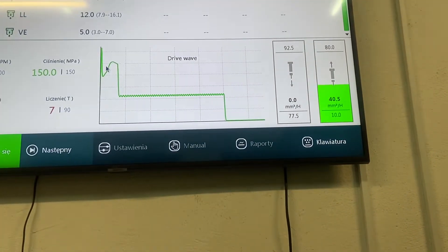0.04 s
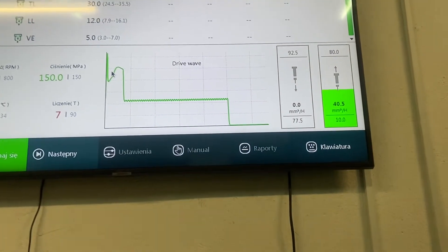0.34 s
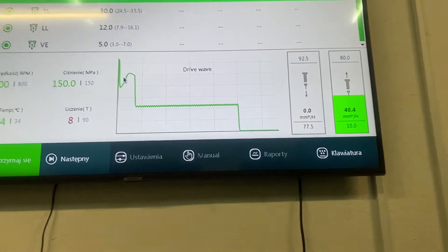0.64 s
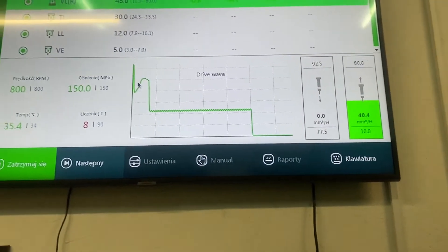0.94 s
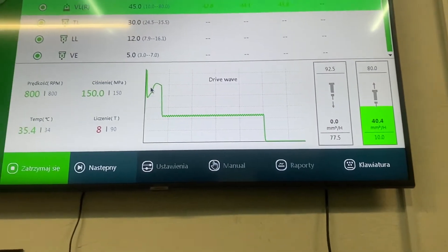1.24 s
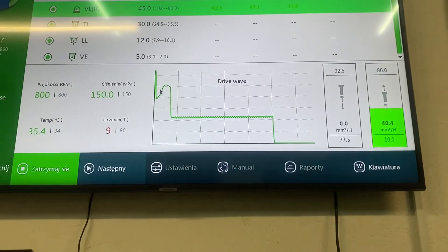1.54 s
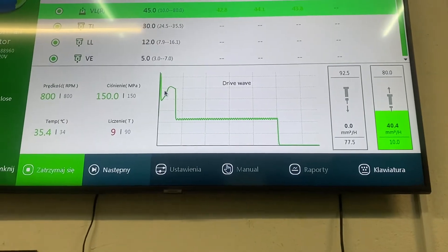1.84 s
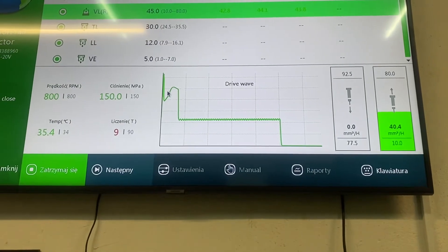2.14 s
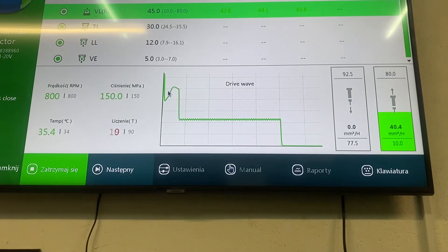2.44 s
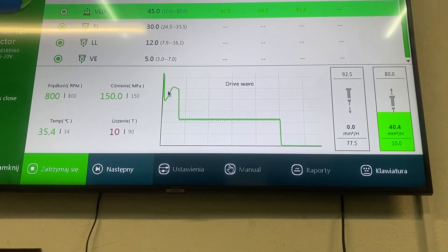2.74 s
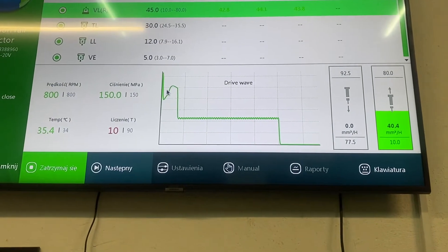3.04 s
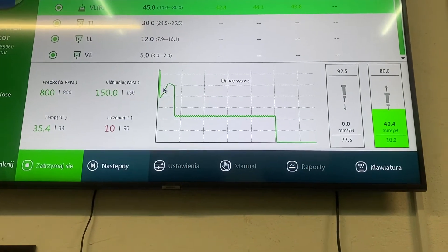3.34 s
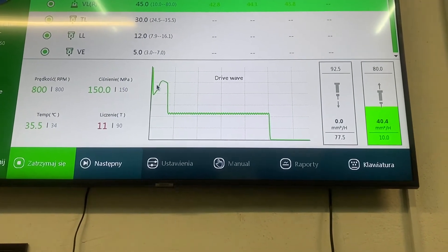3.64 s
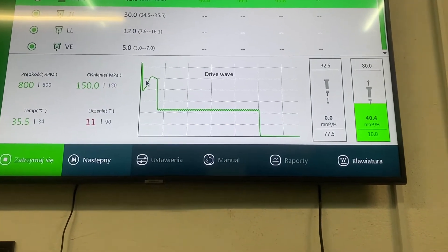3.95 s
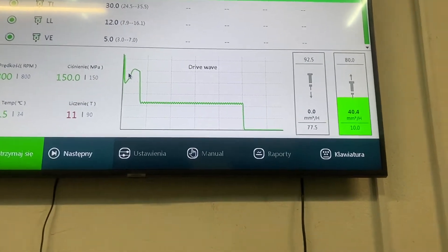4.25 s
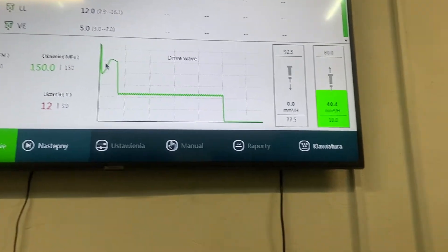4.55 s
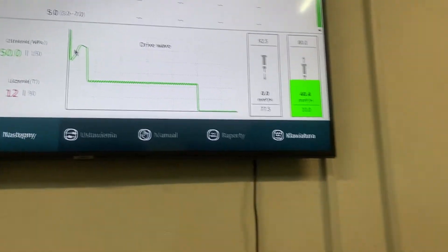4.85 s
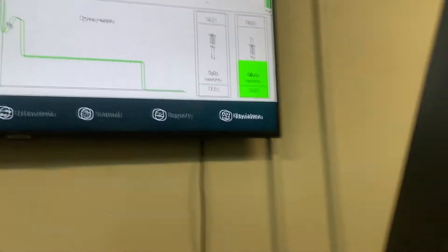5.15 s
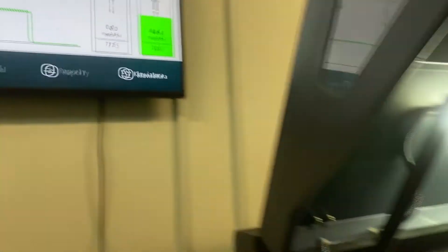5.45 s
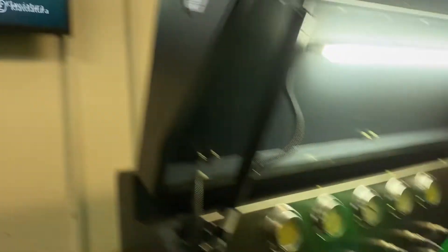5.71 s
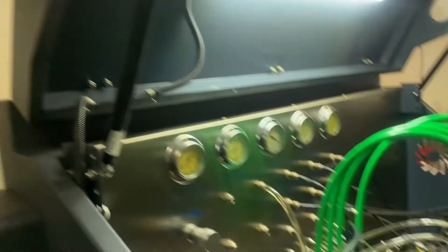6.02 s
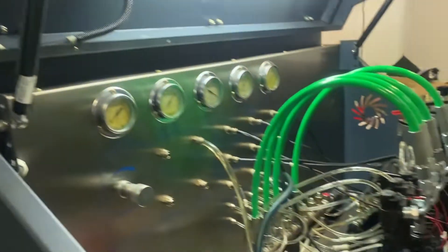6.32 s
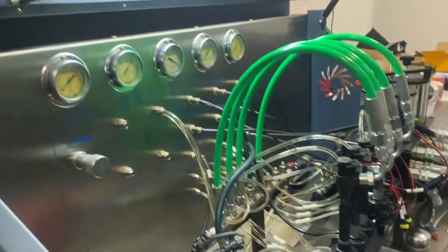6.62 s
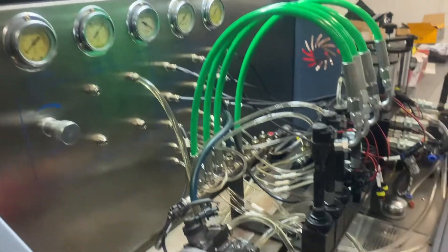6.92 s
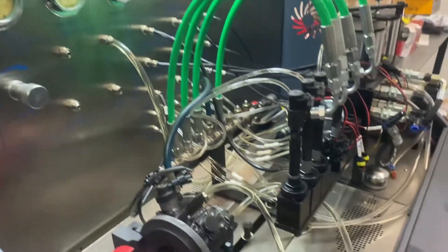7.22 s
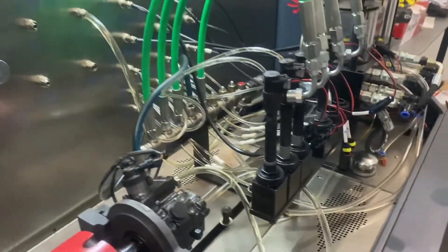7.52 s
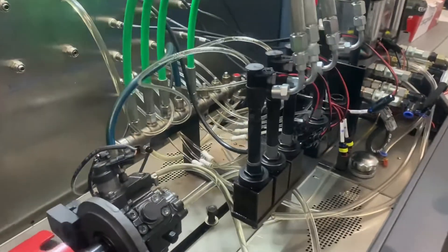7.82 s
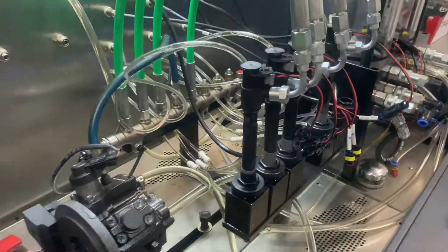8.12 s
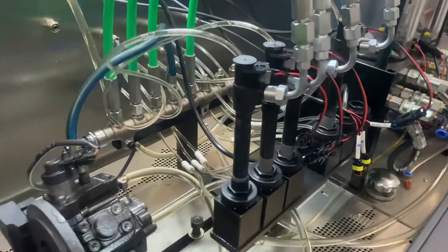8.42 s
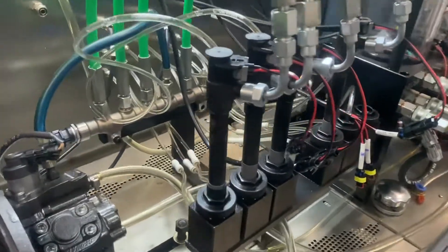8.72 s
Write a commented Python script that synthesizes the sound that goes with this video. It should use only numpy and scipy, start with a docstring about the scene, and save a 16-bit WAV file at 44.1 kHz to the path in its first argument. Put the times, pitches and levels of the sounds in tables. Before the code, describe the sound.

A diesel injector test bench runs without a break in a workshop. Its pump gives a steady low drone and fast metallic clacking, while an injector ticks evenly about seventeen times a second. Oil and fans hiss and hum beneath, and a thin, high motor whine fades in and out. For the first 4.5 seconds or so the machine is a little distant, mixed with room reflections. Between about 4.7 and 5.7 seconds the microphone moves up to the bench: everything grows louder and brighter, with sharper ticks, small fizzing spits of spray and steel parts ringing at shifting pitches. A soft, low handling bump comes at about 7.3 seconds. From around 8 seconds the microphone is closest and the ticking is strongest. The bass drops away at about 8.4 seconds, and the machine is still running at the end, near 9 seconds.

```python
"""In a workshop a diesel injector test bench runs while the microphone moves from the wall screen to the
open bench. A three-plunger pump forces its frame into a drone and clacks once per plunger and turn.
The injector ticks at its own rate, and each impact sets the steel ringing in its natural modes.
Oil and fans hiss beneath, and the motor's inverter whines thinly among the room's standing waves."""
import sys
import numpy as np
from scipy import signal
from scipy.fft import rfft, irfft, next_fast_len
from scipy.io import wavfile
from scipy.ndimage import uniform_filter1d

SR = 44100
rng = np.random.default_rng(int(sys.argv[2]) if len(sys.argv) > 2 else 0)


def write(x):
    x = np.atleast_2d(x).T
    wavfile.write(sys.argv[1], SR, np.round(np.clip(x, -1, 1) * 32767).astype(np.int16))


N = 386757
TIME = np.arange(N) / SR
TAIL = np.arange(8192) / SR  # time axis of one impulse response
TAIL_HZ = np.fft.rfftfreq(len(TAIL), 1 / SR)
SHAFT_HZ, FIRING_HZ, FIRST_FIRING_S = 11.84, 17.0, .0198

# the microphone lingers at the screen, swings round, leans in (time [s], nearness to the bench [0-1])
NEARNESS = [(0, 0.19), (1.7, 0), (4.7, 0.04), (5.7, 0.7), (6.4, 0.75), (7.3, 0.73), (7.9, 0.91),
            (8.35, 0.95), (8.77, 0.97)]
# three stations: afar, beside the bench, leaning in (nearness [0-1])
STATIONS = [0, .76, .98]
# likeness of left and right (frequency [Hz], correlation [-1 to 1])
COHERENCE = [(60, 1), (130, 0.93), (250, 0.83), (400, 0.73), (700, 0.27), (1300, 0.09), (2400, 0.22),
             (4500, 0.61), (8000, 0.15), (11000, 0.2), (15000, -0.36)]


def gain_of(db):
    """Amplitude ratio of a level in decibels."""
    return 10 ** (np.asarray(db) / 20)


def curve(rows, hz, column=1):
    """One column of a spectrum table, interpolated in log frequency."""
    table = np.transpose(rows)
    return np.interp(np.log(hz + 1), np.log(table[0] + 1), table[column])


def shares(x, points):
    """Linear interpolation weights from each point to the next."""
    return np.transpose([np.interp(x, points, row) for row in np.eye(len(points))])


def drift(per_s):
    """Random fluctuation of about unit size."""
    knots = np.arange(0, TIME[-1] + 1, 1 / per_s)
    return np.interp(TIME, knots, rng.standard_normal(len(knots))).astype(np.float32)


def swell(at_s, half_s):
    """Gaussian envelope, from 0 to 1 and back."""
    return np.exp(-((TIME - at_s) / half_s) ** 2)


def travel_s(near):
    """Propagation delay: sound takes longer to reach the wall screen."""
    return .002 * (1 - near)


def port_phase(hz):
    """Phase difference between the microphone's ports; its cosine is their correlation."""
    return np.arccos(np.clip(curve(COHERENCE, hz), -1, 1))


def paired(spectra, hz):
    """Spatial coherence: two close ports hear a room alike in the bass, less so in the treble."""
    # (frequency [Hz], left above right [dB])
    balance = [(60, 0), (130, 4), (290, -0.5), (640, -1.5), (1410, -1), (3100, 2), (6820, 1.5), (15000, -1)]
    angle = (port_phase(hz) / 2).astype(np.float32)
    mid, side = np.cos(angle) * spectra[..., 0, :], np.sin(angle) * spectra[..., 1, :]
    lean = gain_of(curve(balance, hz) / 2).astype(np.float32)
    return np.stack([(mid + side) * lean, (mid - side) / lean], axis=-2)


def resonances(modes):
    """Modal superposition: a sum of steep, double-pole resonances."""
    return sum(gain_of(db) / (1 + 2j * (TAIL_HZ - hz) / width) ** 2 for hz, width, db in modes)


def by_station(modes):
    """The balance of modes depends on the listening position: one response a station."""
    return np.array([resonances([(hz, width, db[station]) for hz, width, *db in modes])
                     for station in range(len(STATIONS))])


def causal(spectrum, ring=0):
    """Minimum phase: nothing sounds before the blow. Spectrum table and ring add in power."""
    gain = np.hypot(abs(ring), gain_of(curve(spectrum, TAIL_HZ)))
    log_gain = np.log(np.r_[gain, gain[-2:0:-1]] + 1e-6)
    return np.exp(np.conj(signal.hilbert(log_gain)))[:len(gain)]


def strokes(first_s, per_s, colour, paths, rise_s, burst_t60, room_db, room_t60, fresh, uneven_db):
    """Periodic impacts at unit rms: reflections follow the position; `fresh` scatter is new each blow."""
    # the microphone reaches a new pattern of reflections (time [s])
    places = [0, 2.2, 4.8, 5.7, 6.8, 8.2, 9.5]
    onsets = first_s + np.arange(-2, TIME[-1] * per_s, 1) / per_s
    near = np.interp(onsets, *np.transpose(NEARNESS))[:, None]
    patterns = rng.standard_normal((len(places), 2, len(TAIL)))
    blows = np.tensordot(np.sqrt(shares(onsets, places)), patterns, 1)
    blows = (blows + fresh * (rng.random(blows.shape) - .5) * np.sqrt(12)) / np.hypot(1, fresh)
    # scatter among the pipes, then the room, which counts less near the bench
    room = gain_of(room_db - 7.8 * near) * gain_of(-60 * TAIL / room_t60)
    decay = np.hypot(gain_of(-60 * TAIL / burst_t60), room) * (1 - np.exp(-TAIL / rise_s))
    blows *= (decay / np.linalg.norm(decay, axis=1, keepdims=True))[:, None]
    spectra = rfft(blows.astype(np.float32))
    # direct sound and strong echoes, levels relative to the scatter, come from alternate sides
    for k, (delay_s, far_db, close_db) in enumerate(paths):
        path = np.array([[1], [1j * (-1) ** k]]) * np.exp(-2j * np.pi * TAIL_HZ * delay_s)
        if delay_s > .004:  # late echoes have lost their treble
            path /= np.hypot(1, (TAIL_HZ / 4500) ** 5)
        spectra += gain_of(far_db + near * (close_db - far_db))[:, None] * path
    spectra *= gain_of(uneven_db * rng.standard_normal((len(onsets), 1, 1)))
    if colour.ndim > 1:  # one colour for each station
        colour = (shares(near[:, 0], STATIONS) @ colour)[:, None]
    blows = irfft(paired(spectra, TAIL_HZ) * colour.astype(np.complex64))
    arrivals = onsets + travel_s(near[:, 0])
    arrivals += .0232 * (onsets < 1.41)  # the beat skips forward once
    padded = np.zeros((2, N + 2 * SR))
    for at, blow in zip(np.round((arrivals + 1) * SR).astype(int), blows):
        padded[:, at:at + len(TAIL)] += blow
    train = padded[:, SR:SR + N]
    return train / np.sqrt(uniform_filter1d(train.mean(0) ** 2, size=SR) + 1e-12)


def tone(hz, waver_db, wander_rad):
    """A sinusoid with slow amplitude and phase modulation, reaching the two ports out of step."""
    apart = port_phase(hz) * rng.choice([-.5, .5]) * np.array([[1], [-1]])
    phase = 2 * np.pi * (hz * TIME + rng.random()) + wander_rad * drift(2.04)
    return np.sqrt(2) * gain_of(waver_db * drift(1.69)) * np.cos((phase + apart).astype(np.float32))


def pump_drone(near):
    """Forced vibration: pressure ripple shakes the frame at shaft harmonics, with a dense burr above."""
    # drone (multiple of the shaft speed, relative level [dB])
    harmonics = [(6, -61), (9, -34.5), (11, -34.5), (12, -36), (13, -35.5), (15, -36), (16, -32.5),
                 (17, -37.5), (19, -35), (20, -44.5), (22, -43.5), (23, -45), (25, -42), (27, -47),
                 (28, -46.5), (33, -52), (35, -51.5)]
    # burr of the frame (frequency [Hz], relative level [dB])
    spectrum = [(150, -32), (260, 0.5), (380, -3.5), (480, -7), (600, -1), (800, -2.5), (950, -13),
                (1500, -50)]
    drone = sum(gain_of(db) * tone(k * SHAFT_HZ, waver_db=0, wander_rad=.097) for k, db in harmonics)
    burr = strokes(0, SHAFT_HZ, causal(spectrum), [],
                   rise_s=.0039, burst_t60=.58, room_db=-6, room_t60=.66, fresh=.047, uneven_db=.5)
    return gain_of(-3 + near) * drone + gain_of(-43 + 1.7 * near) * burr


def fan_hum(near):
    """Tonal noise of rotating machines: fans and feed pump hum at nearly steady pitches."""
    # (frequency [Hz], level afar [dB], gain up close [dB])
    tones = [(100.2, -48, 8), (295.4, -40.5, -4), (304.1, -39.5, -9), (364, -42.5, -2), (391, -55.5, 5),
             (566, -55, 12), (863, -57, 4)]
    return sum(gain_of(db + close_db * near) * tone(hz, waver_db=1.7, wander_rad=.98)
               for hz, db, close_db in tones)


def flow_noise(near):
    """Broadband flow noise: oil and fans rush, louder and brighter near the bench."""
    # (frequency [Hz], relative spectral density [dB], gain up close [dB])
    spectrum = [(20, -28, 2), (40, -9, 2), (59.3, 3, 4), (85.5, -7.5, 8), (132, -0.5, -2.5), (228, 0, 7),
                (300, 1, 2.5), (466, -5.5, 1.5), (823, -4, 4), (970, -15, 0), (1093, -10, 4),
                (1330, -12.5, 6.5), (1650, -6, 6.5), (1940, -11.5, 6.5), (3000, -4.5, 1.5), (3940, -11, 4),
                (4300, -11.5, 0), (4600, -12.5, 4.5), (8170, -16, 3.5), (9100, -94, -10), (9690, -23.5, 9),
                (12000, -26.5, 7.5), (13100, -42, 4), (14200, -25.5, 9), (15500, -31, 8)]
    size = next_fast_len(N, True)
    hz = np.fft.rfftfreq(size, 1 / SR)
    noise = paired(rfft(rng.standard_normal((2, size))), hz) * gain_of(curve(spectrum, hz))
    far = irfft(noise, size)[:, :N]
    close = irfft(noise * gain_of(curve(spectrum, hz, column=2)), size)[:, :N]
    return gain_of(-32 + .18 * drift(12)) * (far + near * (close - far)) / far.mean(0).std()


def standing_waves(near):
    """Interference: reflections raise or lower the gain at each port, faster as the microphone travels."""
    sway_waves_per_s, approach_waves = 1.6, 20
    crossed = sway_waves_per_s * TIME + approach_waves * np.cumsum(abs(np.gradient(near)))
    reflected = [np.interp(crossed, np.arange(len(port)), port) for port in rng.standard_normal((2, 64))]
    return 1 + .25 * np.array(reflected)


def inverter(near):
    """A switching tone and its two sidebands fade in and out among the room's nodes and antinodes."""
    # (sideband number, relative level afar [dB], gain up close [dB])
    lines = [(-1, -52.5, 5), (0, -46.5, 1), (1, -57.5, 13)]
    # standing-wave crests and troughs passed (sideband number, time [s], half length [s], gain [dB])
    crests = [(-1, .5, .25, 9), (-1, 1.9, .5, 7), (-1, 5.3, .42, 14), (-1, 6.55, .25, 7), (-1, 7.4, .15, 7),
              (-1, 8.3, .15, 8), (-1, 8.72, .1, 12), (0, .55, .18, -9), (0, 1.6, .2, -8), (0, 5.0, .3, 7),
              (0, 6.6, .22, 9), (0, 7.35, .12, 5), (0, 8.35, .1, 6), (1, .45, .75, 16), (1, 5.05, .2, 13),
              (1, 5.55, .2, 8), (1, 6.7, .3, 15), (1, 8.35, .1, 10)]
    carrier_hz, spacing_hz = 6001, 48
    whine = 0
    for k, db, close_db in lines:
        crests_db = sum(peak_db * swell(s, half_s) for band, s, half_s, peak_db in crests if band == k)
        level = gain_of(db + close_db * near + crests_db) * standing_waves(near)
        whine += level * tone(carrier_hz + k * spacing_hz, waver_db=1, wander_rad=1.5)
    return whine * gain_of(-3 + 3 * drift(120))  # the level flickers


def injector(near):
    """Short pulses have broad spectra: each firing is a tick of the needle and a spit of spray."""
    # needle tick (frequency [Hz], relative level [dB])
    tick_spectrum = [(100, -17), (300, 1.5), (450, 1), (800, 0), (970, -11), (1250, -5), (2050, -2.5),
                     (2900, 3.5), (4200, -0.5), (6000, -1), (7500, 3.5), (9000, -23), (11000, -16),
                     (15500, -10)]
    # fizz of the fuel spray (frequency [Hz], relative level [dB])
    spray_spectrum = [(5000, -29), (9000, -37), (10000, 0.5), (11200, 3.5), (12300, -1), (13100, -22),
                      (14200, -1), (15500, -4.5)]
    tick = strokes(FIRST_FIRING_S - .001, FIRING_HZ, causal(tick_spectrum), [],
                   rise_s=.0038, burst_t60=.045, room_db=-15.5, room_t60=.22, fresh=.6, uneven_db=2.7)
    spray = strokes(FIRST_FIRING_S - .0015, FIRING_HZ, causal(spray_spectrum), [],
                    rise_s=.0019, burst_t60=.043, room_db=-7, room_t60=.18, fresh=3.3, uneven_db=2)
    return gain_of(-45 + 12 * near) * tick + gain_of(-53 + 15 * near) * spray


def pump_valves(near):
    """Impact excitation: each plunger snaps its valve once a turn and rings its own pipe."""
    # one row a plunger (first stroke [s], level at each station [dB])
    plungers = [(.0194, -38.5, -32, -31), (.048, -44, -35, -32.5), (.0745, -42.5, -35, -29.5)]
    # valve and pipe modes (plunger, frequency [Hz], width [Hz], relative level at each station [dB])
    valve_modes = [(0, 1770, 254, 8, 1, -14), (0, 2807, 190, -4, 16, 12), (0, 2931, 198, 24, 18, 21.5),
                   (0, 2961, 70, 10, 16.4, 22), (0, 3280, 373, 14, 7, 17), (0, 4970, 400, 7, 6.2, 15),
                   (0, 5610, 596, 11, 7.5, 17), (0, 7030, 415, -4, 8.9, 14.5),
                   (1, 1645, 300, 24, 19.2, 18.5), (1, 2610, 199, 7.5, 17.2, 21.5),
                   (1, 3000, 400, 13, 6, 9), (1, 5310, 278, 24, 18, 20), (1, 5590, 350, 1, 12, 11),
                   (1, 7670, 770, -17, 8, 9), (2, 3000, 400, -2, 6, -2), (2, 3358, 189, 1, 7.6, 23.5),
                   (2, 3499, 121, 23.5, 22.7, 21.5), (2, 3710, 400, 11, 6, 14),
                   (2, 4080, 397, 18.5, 12, 14.5), (2, 6900, 870, -14, 2.6, 0)]
    # direct sound and echoes (plunger, delay [s], level afar [dB], level up close [dB])
    valve_paths = [(0, 0, -5, 2), (0, .0052, 1, -11), (0, .0085, -5, -2), (0, .017, -12, -6),
                   (0, .027, -14, -8), (1, .0008, 3, -2), (2, .00092, -3, -5), (2, .003, -1, -5),
                   (2, .008, -1, -7)]
    # dry clack under the modes (frequency [Hz], relative level [dB])
    spectrum = [(100, -65), (400, -14), (700, 2.5), (1000, -17), (2300, -33), (4500, -1), (7500, 1),
                (9000, -89), (11000, -2.5), (13100, -40), (15000, -9)]
    out = 0
    for k, (first_s, *levels_db) in enumerate(plungers):
        modes = [row[1:] for row in valve_modes if row[0] == k]
        paths = [row[1:] for row in valve_paths if row[0] == k]
        colours = np.array([causal(spectrum, ring) for ring in by_station(modes)])
        clack = strokes(first_s, SHAFT_HZ, colours, paths,
                        rise_s=.0019, burst_t60=.034, room_db=-6, room_t60=.22, fresh=.46, uneven_db=.84)
        out += gain_of(np.interp(near, STATIONS, levels_db)) * clack
    return out


def needle_seat(near):
    """Impact and reflection: the needle snaps on its seat, the nozzle pings, a wall returns the ping."""
    # resonances (frequency [Hz], width [Hz], relative level [dB])
    snap_modes = [(7380, 830, 0)]
    ping_modes = [(3097, 590, 0)]
    # direct sound and any echo (delay [s], level afar [dB], level up close [dB])
    snap_paths = [(0, 4, 2)]
    ping_paths = [(0, 3, 3), (.0068, 4, -2)]
    snap = strokes(FIRST_FIRING_S + .0002, FIRING_HZ, resonances(snap_modes), snap_paths,
                   rise_s=.001, burst_t60=.048, room_db=-14, room_t60=.15, fresh=.45, uneven_db=2.5)
    ping = strokes(FIRST_FIRING_S + .00029, FIRING_HZ, resonances(ping_modes), ping_paths,
                   rise_s=.0012, burst_t60=.034, room_db=2, room_t60=.18, fresh=.4, uneven_db=.9)
    return gain_of(-52.5 + 7.5 * near) * snap + gain_of(-44 + 2.9 * near) * ping


def ringing_bench(near):
    """Structure-borne sound: each firing rings the holder, then the drip tray, lid and back panel."""
    # injector holder (frequency [Hz], width [Hz], relative level at each station [dB])
    holder_modes = [(1522, 33, 3.5, 5, 3), (1597, 103, 7.5, 6, 1.5), (1693.5, 72, 3.5, 3.5, 4.5),
                    (1847, 17.5, 3.5, 9, 2)]
    # sheet-metal modes (frequency [Hz], width [Hz], relative level [dB])
    tray_modes = [(1100, 170, 0)]
    lid_modes = [(544, 63, -24), (625.8, 29, 9.5), (702, 158, -3)]
    panel_modes = [(670, 51, 7)]
    # direct sound and echoes (delay [s], level afar [dB], level up close [dB])
    holder_paths = [(0, 3, 2), (.02003, 2, -14), (.02315, 0, -16), (.04193, -1, -18)]
    lid_paths = [(0, -4, -1.4), (.019, -8, -0.61)]
    panel_paths = [(0.00084, 0, 3)]
    # where holder, lid, panel and tray are loudest
    # (level afar [dB], gain at the spot [dB], spot [nearness], reach [nearness])
    spots = [(-38, 2, 0.9, 0.11), (-41, 6, 0.74, 0.084), (-49, 19.5, 1.0, 0.25), (-46.5, 1.5, 0.97, 0.12)]
    holder = strokes(FIRST_FIRING_S + .001744, FIRING_HZ, by_station(holder_modes), holder_paths,
                     rise_s=.001, burst_t60=.017, room_db=-2, room_t60=.31, fresh=.3, uneven_db=.4)
    tray = strokes(FIRST_FIRING_S + .001973, FIRING_HZ, resonances(tray_modes), [],
                   rise_s=.0045, burst_t60=.03, room_db=-6.5, room_t60=.29, fresh=.13, uneven_db=.5)
    lid = strokes(FIRST_FIRING_S + .0039, FIRING_HZ, resonances(lid_modes), lid_paths,
                  rise_s=.0012, burst_t60=.1, room_db=19, room_t60=.18, fresh=.43, uneven_db=2.5)
    panel = strokes(FIRST_FIRING_S + .00445, FIRING_HZ, resonances(panel_modes), panel_paths,
                    rise_s=.0031, burst_t60=.17, room_db=-1.5, room_t60=.18, fresh=.27, uneven_db=2.5)
    return sum(gain_of(db + spot_db * np.exp(-((near - spot) / reach) ** 2)) * part
               for part, (db, spot_db, spot, reach) in zip([holder, lid, panel, tray], spots))


def singing_steel():
    """Damped free vibration: steel parts sing after each firing, heard as the microphone passes them."""
    # (frequency [Hz], decay by 60 dB [s], level [dB], time passed [s], half length [s])
    parts = [(559.6, 0.23, -43.5, 7.03, 1.16), (796, 0.073, -44, 7.6, .55), (863, .2, -45, 7.35, 0.58),
             (1054, 0.12, -42.5, 8.4, 0.76), (1122, 0.063, -41, 5.77, 0.41), (1240, .06, -47.5, 6.7, .7),
             (1510, .035, -39.5, 5.56, 0.32), (1574, 0.089, -32.5, 5.62, 0.39),
             (1643, 0.1, -35.5, 7.67, 1.34), (1584, 0.044, -33.5, 8.33, 0.78),
             (2276, 0.15, -41.5, 6.5, 0.38)]
    delay_s, rise_s, uneven_db = .00173, .0033, 1.2
    onsets = np.arange(FIRST_FIRING_S + delay_s, TIME[-1], 1 / FIRING_HZ)
    onsets += travel_s(np.interp(onsets, *np.transpose(NEARNESS)))
    out = np.zeros((2, N))
    for hz, t60, db, at_s, half_s in parts:
        blows = np.zeros(N)
        blows[(onsets * SR).astype(int)] = gain_of(uneven_db * rng.standard_normal(len(onsets)))
        apart = port_phase(hz) * np.array([[.5], [-.5]])
        envelope = (1 - np.exp(-TAIL / rise_s)) * gain_of(-60 * TAIL / t60)
        ring = envelope * np.cos(2 * np.pi * hz * TAIL + apart)
        ring *= np.sqrt(SR / FIRING_HZ) / np.linalg.norm(ring.mean(0))
        out += gain_of(db) * swell(at_s, half_s) * signal.oaconvolve(blows[None], ring, axes=1)[:, :N]
    return out


def hand_bump():
    """Handling noise: the hand bumps the microphone, giving a few cycles of low thud."""
    # (time [s], frequency [Hz], level [dB], half length [s])
    thud = (7.32, 52, -31, .035)
    at_s, hz, db, half_s = thud
    return gain_of(db) * swell(at_s, half_s) * np.sin(2 * np.pi * hz * (TIME - at_s))


def scene():
    """Superposition of all sources at the moving microphone."""
    near = np.interp(TIME, *np.transpose(NEARNESS))
    machinery = pump_drone(near) + fan_hum(near) + pump_valves(near)
    firings = injector(near) + ringing_bench(near) + needle_seat(near) + singing_steel()
    return machinery + firings + flow_noise(near) + inverter(near) + hand_bump()


def record(dry):
    """Filtering: a low shelf drops the bass near the end, and a steep low-pass limits the band."""
    shelf_hz, shelf_db, drop_at_s, edge_hz = 225, -13, 8.39, 15900
    bass = signal.sosfiltfilt(signal.butter(2, shelf_hz, fs=SR, output="sos"), dry)
    cut = (1 - gain_of(shelf_db)) * np.clip((TIME - drop_at_s) / .03, 0, 1)
    band_limit = signal.firwin(511, edge_hz, window=("kaiser", 9), fs=SR)
    return signal.oaconvolve(dry - cut * bass, band_limit[None], "same")


dry = scene()
out = record(dry)
write(out)
```